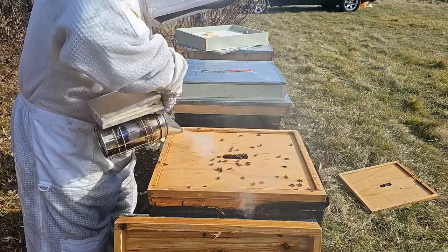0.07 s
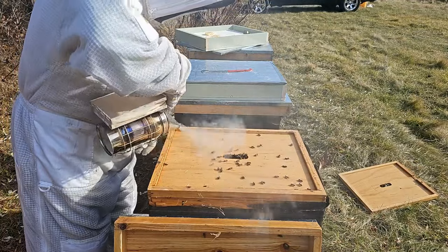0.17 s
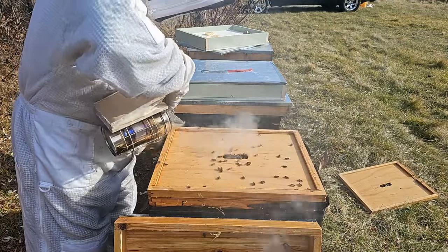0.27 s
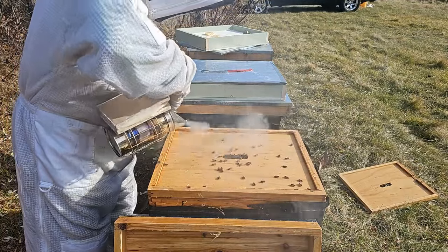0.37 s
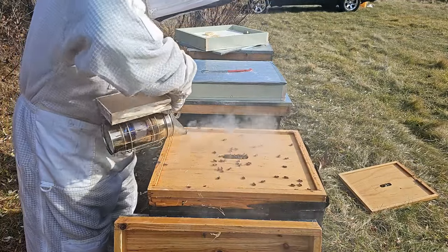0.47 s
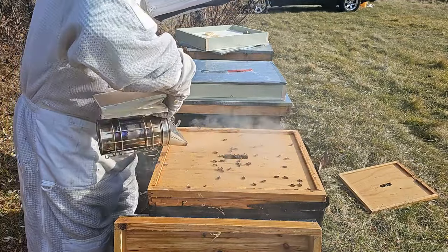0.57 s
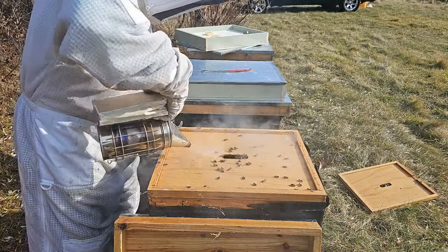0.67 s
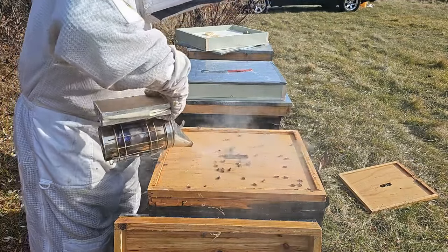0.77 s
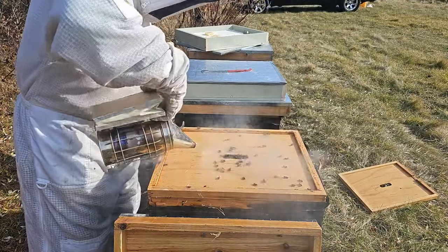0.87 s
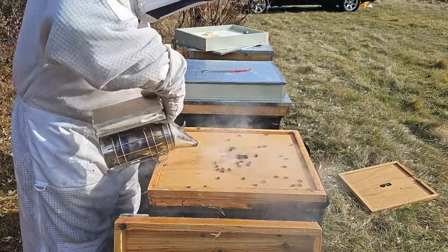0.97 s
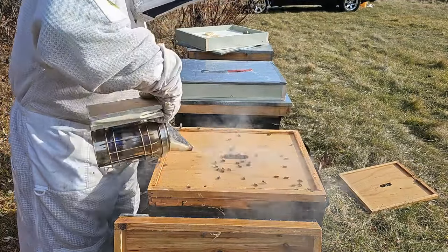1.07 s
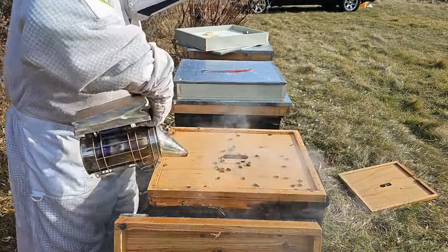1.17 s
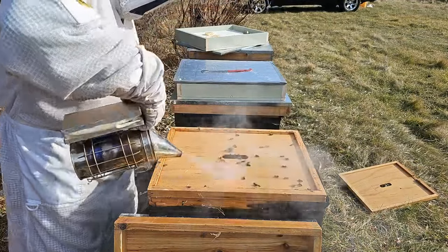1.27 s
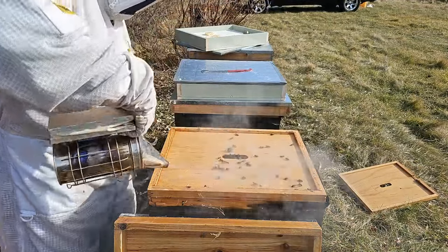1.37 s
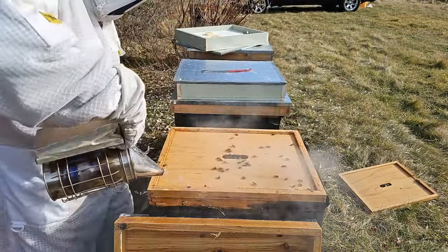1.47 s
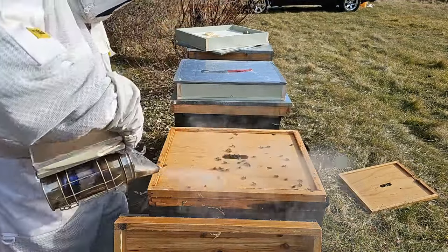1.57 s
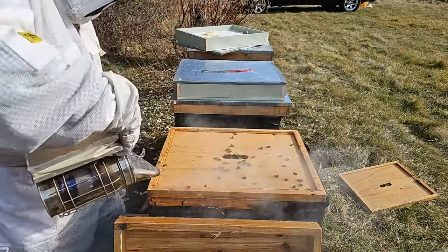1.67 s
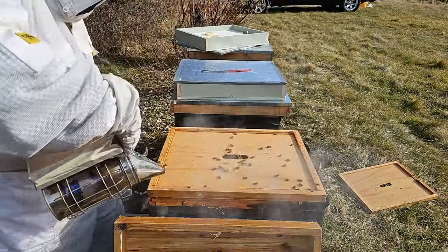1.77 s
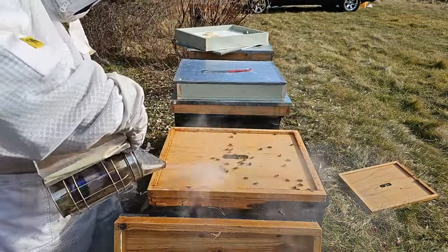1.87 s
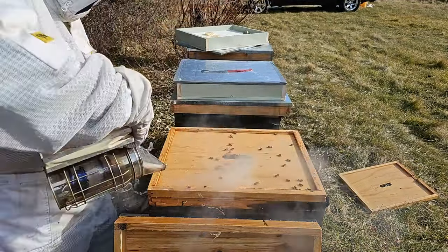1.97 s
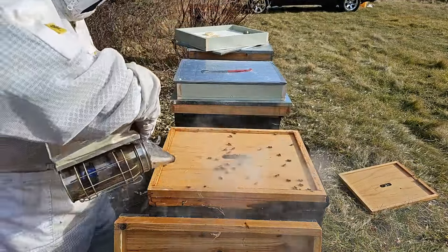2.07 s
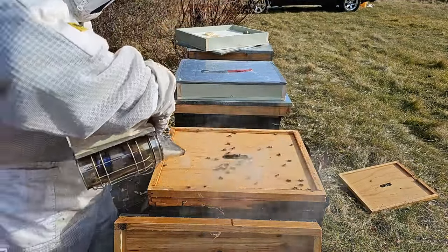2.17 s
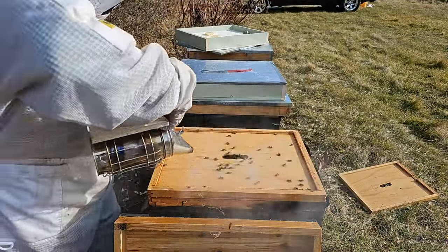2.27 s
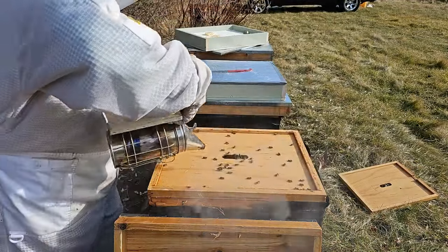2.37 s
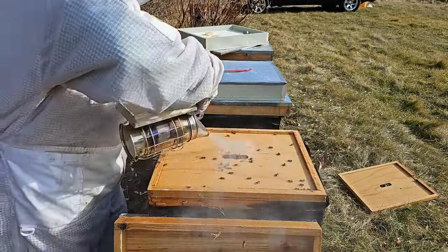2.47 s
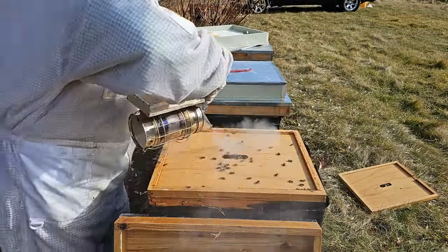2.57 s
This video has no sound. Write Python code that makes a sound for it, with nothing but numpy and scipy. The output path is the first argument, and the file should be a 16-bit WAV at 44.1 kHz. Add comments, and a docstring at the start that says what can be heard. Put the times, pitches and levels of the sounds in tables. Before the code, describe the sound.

A bee smoker's bellows pumped seven times, breathy hollow puffs with faint wheezes between, outdoors

```python
"""Outdoors, cloth rubs softly, then a bee smoker is pumped seven times over an open hive.
Each squeeze of the bellows makes the can boom hollowly and drives a jet of air through the nozzle;
after each, the bellows draw air back with a faint wheeze; after the fifth the can hums along.
Jet, rush, hiss and air are coloured noise, resonances are noise-modulated carriers, knocks short sines.
A dull echo and faint scatter trail the smoker, more rubs close the scene; a limiter flattens the puffs."""
import sys
import numpy as np
from scipy import signal
from scipy.fft import rfft, irfft
from scipy.io import wavfile
from scipy.ndimage import uniform_filter1d, minimum_filter1d

SR = 44100
rng = np.random.default_rng(int(sys.argv[2]) if len(sys.argv) > 2 else 0)


def store_pcm(level_fs):
    """Save levels as 16-bit WAV."""
    pcm = np.round(np.clip(level_fs, -1, 1) * 32767).astype(np.int16)
    wavfile.write(sys.argv[1], SR, np.atleast_2d(pcm).T)


N = 114660
T = np.arange(N) / SR


def from_db(db):
    """Decibels to amplitude gain."""
    return 10 ** (np.asarray(db) / 20)


def rms_one(x):
    """Scale to unit power."""
    return x / np.sqrt(np.mean(x ** 2) + 1e-20)


def noise(spectrum):
    """Noise coloured by a spectrum interpolated in dB over log frequency, rms 1."""
    hz, db = np.transpose(spectrum)
    f = np.maximum(np.fft.rfftfreq(N, 1 / SR), 1)
    colour = from_db(np.interp(np.log(f), np.log(hz), db))
    return rms_one(irfft(rfft(rng.standard_normal(N)) * colour, N))


def slow(rate_hz):
    """Random wandering up to a given rate, rms 1."""
    low_pass = signal.butter(2, rate_hz, fs=SR, output="sos")
    wander = signal.sosfilt(low_pass, rng.standard_normal(2 * N))
    return rms_one(wander[N:])  # first half lets the filter settle


def resonance(hz, width_hz):
    """A resonance stirred by turbulent air: slow noise on two quadrature carriers; hz may glide."""
    phase = 2 * np.pi * np.cumsum(hz * np.ones(N)) / SR
    return slow(width_hz / 2) * np.cos(phase) + slow(width_hz / 2) * np.sin(phase)


def stroke(start_s, length_s, rise_s, fall_s, arch=0):
    """Envelope of one stroke: smooth rise, hold arched by a power of a half sine, smooth fall."""
    t = T - start_s
    rise = np.sin(np.pi / 2 * np.clip(t / rise_s, 0, 1))
    fall = np.sin(np.pi / 2 * np.clip((length_s - t) / fall_s, 0, 1))
    hold = np.abs(np.sin(np.pi * np.clip(t / length_s, 0, 1))) ** arch
    return (rise * fall) ** 2 * hold


def open_air():
    """Steady coloured noise of the open air under a slowly changing level."""
    # spectrum: hz, db_per_hz
    air_spectrum = [(25, -18.5), (55, -11.5), (90, -10.5), (130, 10.5), (190, 2), (400, -2.5), (900, -3),
                    (1600, -11.5), (2400, -23), (4000, -29.5), (6800, -37)]
    # level: time_s, level_db
    air_level = [(0, -38), (0.2, -38.5), (0.5, -45), (1.1, -46), (1.5, -43.5), (2.0, -44), (2.6, -44.5)]
    return noise(air_spectrum) * from_db(np.interp(T, *np.transpose(air_level)))


def rubs():
    """Cloth of suit and glove slides as the arm moves: noise swelling and fading symmetrically."""
    # rubs: start_s, length_s, level_db
    rub_events = [(-0.004, 0.22, -45.5), (2.134, 0.088, -38), (2.232, 0.062, -40), (2.452, 0.14, -48.5)]
    # spectrum: hz, db_per_hz
    rub_spectrum = [(150, -19), (500, -1), (1700, 14.5), (2400, -1.5), (3200, -1), (3900, 0), (4700, -11),
                    (7000, -20.5)]
    envelope = sum(from_db(level_db) * stroke(start_s, length_s, length_s / 2, length_s / 2)
                   for start_s, length_s, level_db in rub_events)
    return noise(rub_spectrum) * envelope


def echo(t60_s):
    """A dying train of random reflections with unit energy."""
    delay_s = 0.015
    tail = rng.standard_normal(N) * from_db(-60 * T / t60_s) * (T > delay_s)
    return tail / np.sqrt(np.sum(tail ** 2))


def yard(x):
    """A dull echo from the surroundings and a faint bright scatter from the hives close by."""
    echo_db, echo_t60_s, echo_dull_hz = -10.5, 0.25, 850  # echo_db: ahead of the dulling
    scatter_db, scatter_t60_s = -30, 0.47
    low_pass = signal.butter(2, echo_dull_hz, fs=SR, output="sos")
    dull = signal.sosfilt(low_pass, echo(echo_t60_s))
    response = from_db(echo_db) * dull + from_db(scatter_db) * echo(scatter_t60_s)
    return signal.fftconvolve(x, response)[:N]


def refills():
    """Air is sucked back through the bellows' port with a wavering wheeze; once the can hums along."""
    # refills: start_s, length_s, air_db, wheeze_hz, wheeze_width_hz, wheeze_db, glide_hz_per_s, sizzle_db
    refill_strokes = [(0.357, 0.24, -42.5, 1675, 226, -45.5, 294.5, -72),
                      (0.689, 0.17, -41, 1498, 400, -40, -500, -71),
                      (0.986, 0.16, -48, 1273, 202.5, -40.5, -7.5, -56),
                      (1.26, 0.16, -50.5, 1332, 171, -40, 495, -62.5),
                      (1.518, 0.2, -43.5, 1404, 188, -39.5, 0.5, -85),
                      (1.83, 0.160, -49, 1950, 350, -44.5, 2999, -66),
                      (2.143, 0.19, -52, 1680, 80, -48, 1499, -67)]
    # spectrum of the drawn air: hz, db_per_hz
    draw_spectrum = [(100, -19), (250, -33), (600, -30), (1050, -6.5), (1350, 6.5), (1800, 9.5),
                     (2050, -1.5), (2450, 0.5), (3400, -5), (4400, -22), (6400, -23.5), (7000, -37.5)]
    # thin sizzle at the port: hz, db_per_hz
    sizzle_spectrum = [(2000, -32.5), (4600, -21), (5500, 1), (6200, 3.5), (6600, 3), (7000, -9)]
    # the one hollow draw: start_s, length_s, level_db (at its start)
    hollow_draw = (1.55, 0.2, -34)
    # modes of the can: mode_hz, width_hz, level_db
    can_modes = [(264, 18, -8), (539.7, 37, 5), (898, 24, -2), (1720, 56, -5), (2670, 200, -11)]
    rise_s, fall_s = 0.031, 0.082
    waver_share, waver_hz = 0.008, 14
    hollow_fade_db_per_s = 63

    draw, sizzle, out = noise(draw_spectrum), noise(sizzle_spectrum), 0
    waver = 1 + waver_share * slow(waver_hz)
    for start_s, length_s, air_db, hz, width_hz, wheeze_db, glide_hz_per_s, sizzle_db in refill_strokes:
        from_middle_s = np.clip(T - start_s - length_s / 2, -length_s, length_s)
        wheeze = resonance(waver * (hz + glide_hz_per_s * from_middle_s), width_hz)
        air = from_db(air_db) * draw + from_db(wheeze_db) * wheeze + from_db(sizzle_db) * sizzle
        out = out + air * stroke(start_s, length_s, rise_s, fall_s)

    start_s, length_s, level_db = hollow_draw
    hum = sum(from_db(mode_db) * resonance(waver * mode_hz, width_hz)
              for mode_hz, width_hz, mode_db in can_modes)
    fade = from_db(level_db - hollow_fade_db_per_s * np.clip(T - start_s, 0, length_s))
    return out + fade * hum * stroke(start_s, length_s, rise_s, fall_s)


def knocks():
    """Short low knocks near the start of some puffs, about two cycles of a sine."""
    # knocks: start_s, peak_db
    knock_events = [(0.233, -14), (0.568, -12), (0.851, -15), (1.731, -21.5)]
    knock_hz, length_s = 198.4, 0.0099
    out = 0
    for start_s, peak_db in knock_events:
        sine = np.sin(2 * np.pi * knock_hz * (T - start_s))
        out = out + from_db(peak_db) * sine * stroke(start_s, length_s, length_s / 2, length_s / 2)
    return out


def puffs():
    """The can booms as soon as air moves; rush and jet follow, and the hiss needs the fastest flow."""
    # squeezes: start_s, length_s, jet_db, boom_db, rush_db, hiss_db, upper_nozzle_db, nozzle_hz, can_hz
    squeezes = [(0.215, 0.17, -13.5, -16.5, -18.5, -23.5, -22, 1316, 195),
                (0.55, 0.13, -12, -19, -18, -21.5, -24.5, 1310, 184.6),
                (0.854, 0.13, -13, -20, -16.5, -23, -30.5, 1367, 190),
                (1.149, 0.12, -13.5, -18, -17, -22.5, -38, 1303, 200),
                (1.429, 0.12, -18.5, -17.5, -20.5, -28.5, -35.5, 1343, 245),
                (1.716, 0.11, -13, -16, -17, -24.5, -21, 1450, 235),
                (2.022, 0.13, -12, -17, -19.5, -22, -23.5, 1342, 224.3)]
    # spectra of the low rush through the can, the jet and its hiss: hz, db_per_hz
    rush_spectrum = [(50, -39), (90, -31.5), (130, -8.5), (310, 1), (420, -2.5), (600, -5.5), (760, -20),
                     (1200, -11.5), (2500, -42), (7000, -57)]
    jet_spectrum = [(90, -43), (250, -30), (800, -3), (940, -6.5), (1130, 5), (1700, 2), (2000, -8),
                    (2550, -15.5), (3300, -18.5), (4100, -29.5), (4550, -42.5), (7000, -67)]
    hiss_spectrum = [(900, -7.5), (1700, -6), (2400, 0), (3000, -7.5), (3900, -11.5), (4300, -19),
                     (4550, -32), (4900, -17), (6400, -17.5), (7000, -30.5)]
    boom_lead_s, boom_lag_s, boom_rise_s, boom_fall_s = 0.014, 0.0049, 0.058, 0.017
    can_width_hz, boom_low_hz = 91.3, 140.4
    rush_lag_s, rush_rise_s, rush_fall_s = 0.011, 0.048, 0.039
    jet_rise_s, jet_fall_s, jet_arch = 0.051, 0.029, 0.64
    nozzle_width_hz, nozzle_db = 204, -7  # nozzle_db: relative to the jet noise
    upper_hz, upper_width_hz = 2247, 790
    hiss_lag_s, hiss_rise_s, hiss_fall_s, hiss_arch = 0.013, 0.078, 0.011, 2.05

    rush, jet, hiss, out = noise(rush_spectrum), noise(jet_spectrum), noise(hiss_spectrum), 0
    low_cut = signal.butter(4, boom_low_hz, "high", fs=SR, output="sos")
    for start_s, length_s, jet_db, boom_db, rush_db, hiss_db, upper_db, nozzle_hz, can_hz in squeezes:
        boom = signal.sosfilt(low_cut, resonance(can_hz, can_width_hz))
        boom_length_s = length_s + boom_lead_s + boom_lag_s
        boom_flow = stroke(start_s - boom_lead_s, boom_length_s, boom_rise_s, boom_fall_s)
        rush_flow = stroke(start_s, length_s + rush_lag_s, rush_rise_s, rush_fall_s)
        roar = jet + from_db(nozzle_db) * resonance(nozzle_hz, nozzle_width_hz)
        upper = resonance(upper_hz, upper_width_hz)
        jet_flow = stroke(start_s, length_s, jet_rise_s, jet_fall_s, jet_arch)
        hiss_flow = stroke(start_s, length_s + hiss_lag_s, hiss_rise_s, hiss_fall_s, hiss_arch)
        out = out + from_db(boom_db) * boom * boom_flow
        out = out + from_db(rush_db) * rush * rush_flow
        out = out + (from_db(jet_db) * roar + from_db(upper_db) * upper) * jet_flow
        out = out + from_db(hiss_db) * hiss * hiss_flow
    return out


def scene():
    """The smoker close by, its echo, the rubs and the open air, in one channel."""
    smoker = refills() + knocks() + puffs()
    return (open_air() + rubs() + yard(smoker) + smoker)[None]


def record(dry):
    """The microphone drops the deep bass, a fast limiter holds the peaks down, the top is cut."""
    mic_low_hz, cutoff_hz = 108, 7100
    ceiling, release_db_per_s = 0.53, 147  # ceiling: amplitude ahead of the top cut
    low_cut = signal.butter(3, mic_low_hz, "high", fs=SR, output="sos")
    top_cut = signal.ellip(10, 0.2, 80, cutoff_hz, fs=SR, output="sos")
    dry = signal.sosfilt(low_cut, dry)
    over_db = 20 * np.log10(np.maximum(np.abs(dry[0]) / ceiling, 1))
    # instant attack, release linear in dB
    ramp_db = release_db_per_s * T
    gain_db = ramp_db - np.maximum.accumulate(over_db + ramp_db)
    # centred windows: the gain falls smoothly ahead of each peak
    gain_db = uniform_filter1d(minimum_filter1d(gain_db, size=129), size=129)
    return signal.sosfilt(top_cut, dry * from_db(gain_db))


dry = scene()
out = record(dry)
store_pcm(out)
```